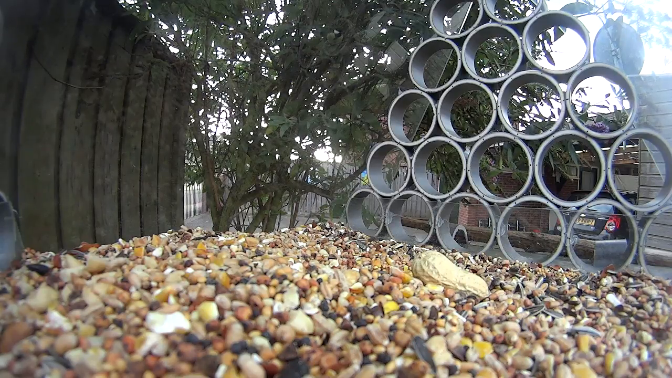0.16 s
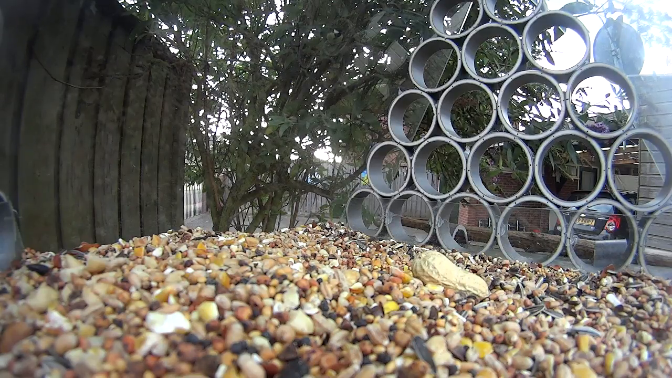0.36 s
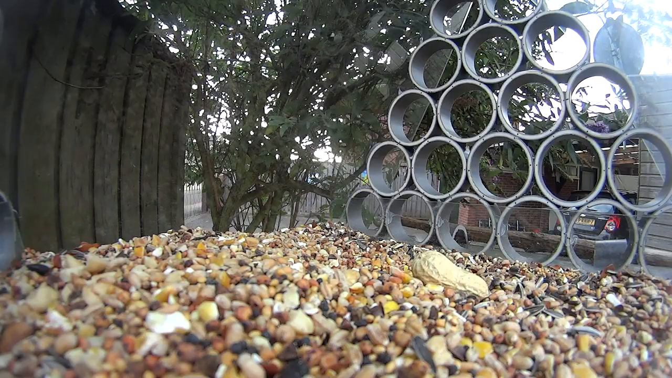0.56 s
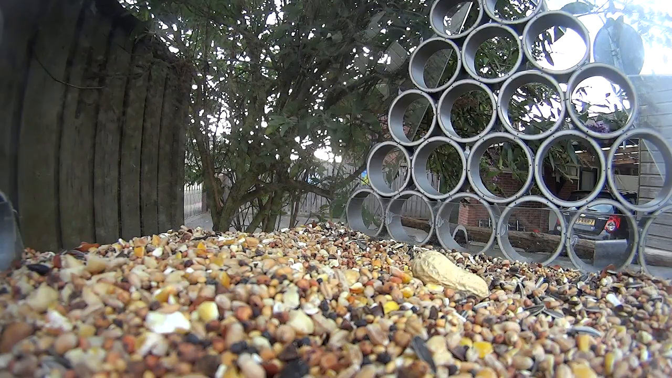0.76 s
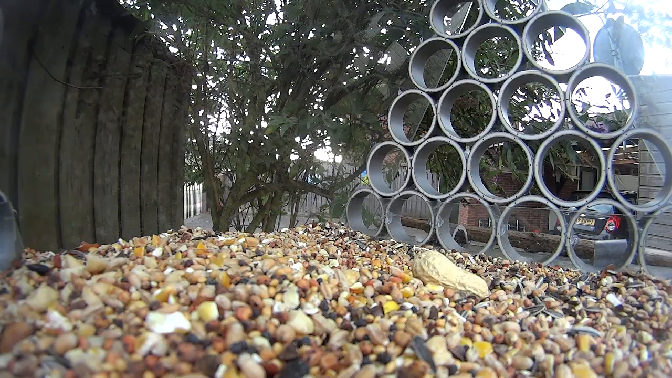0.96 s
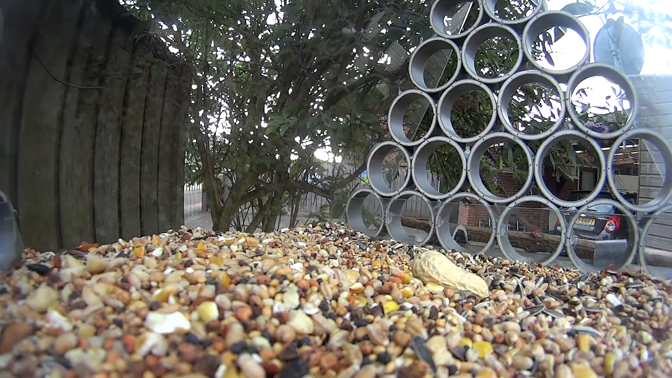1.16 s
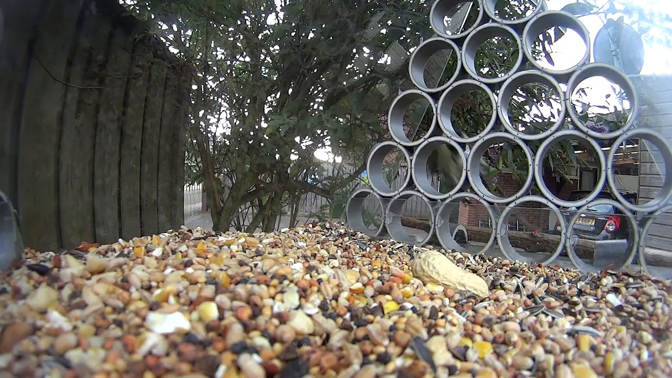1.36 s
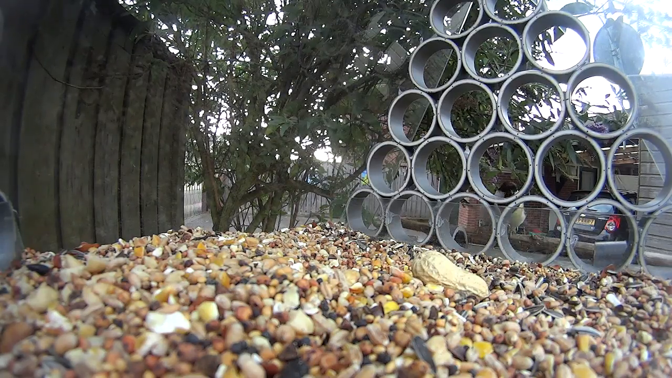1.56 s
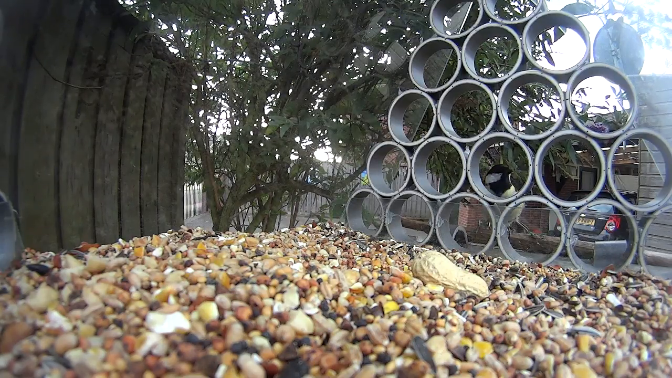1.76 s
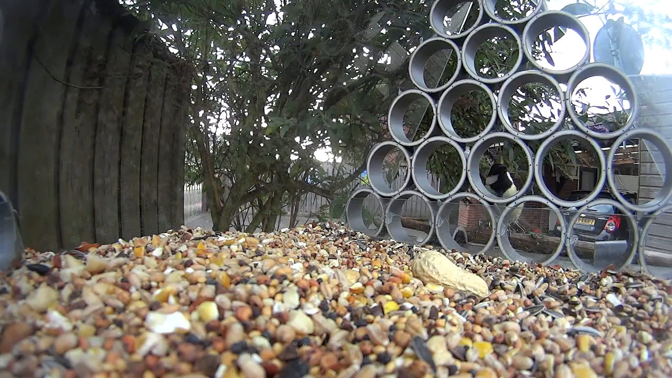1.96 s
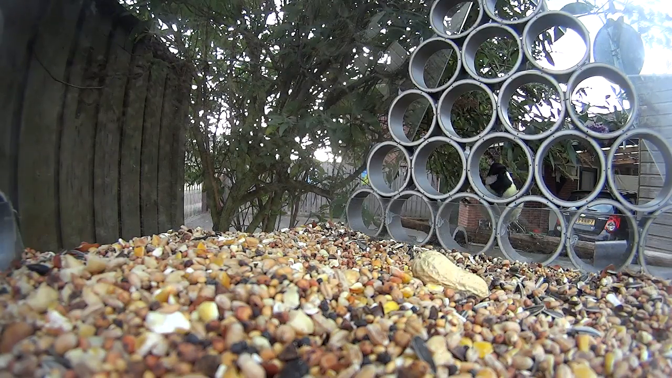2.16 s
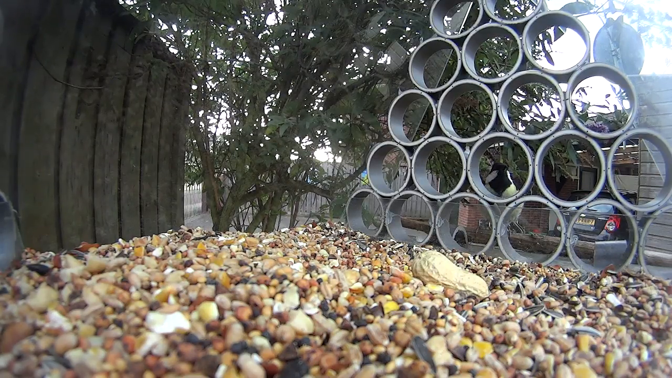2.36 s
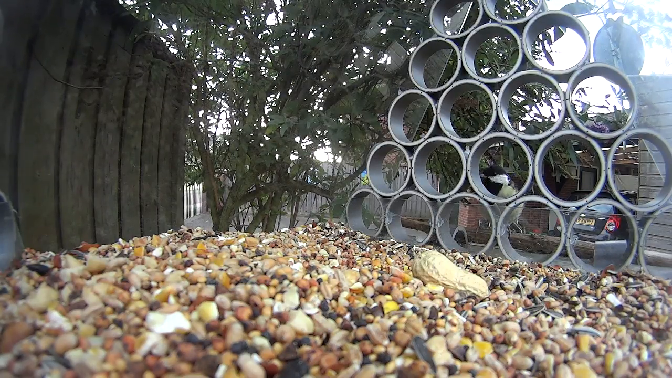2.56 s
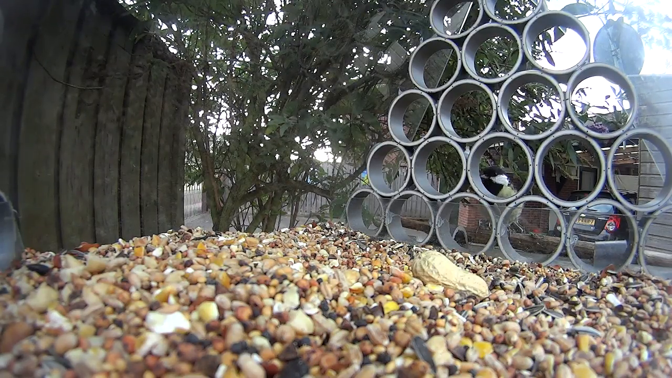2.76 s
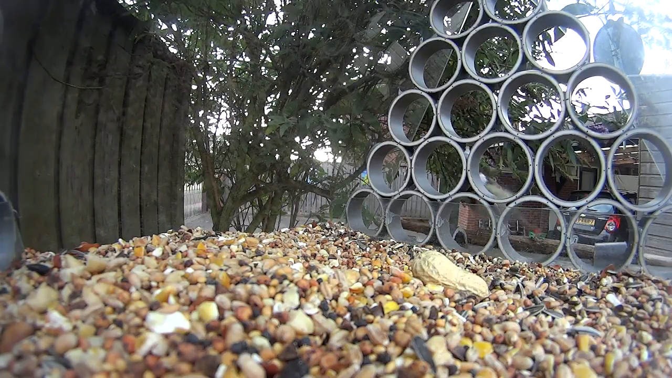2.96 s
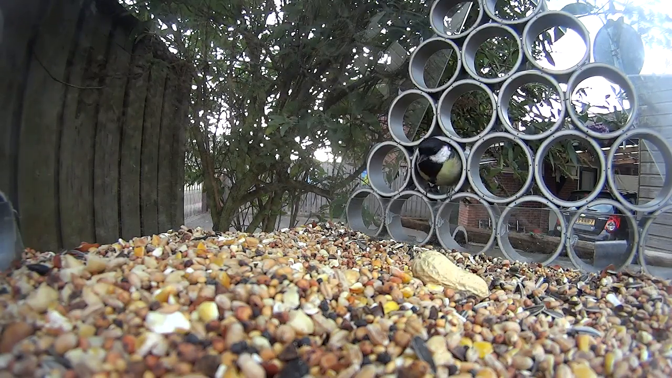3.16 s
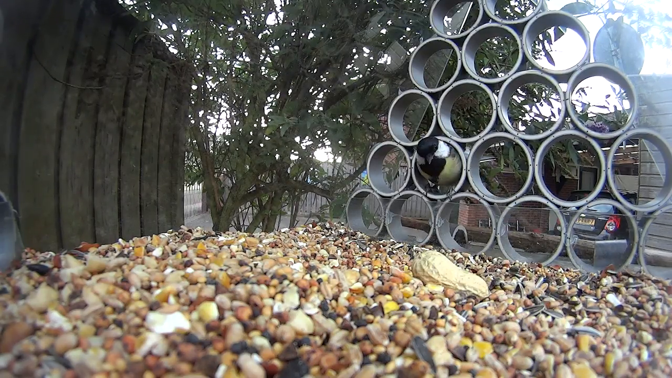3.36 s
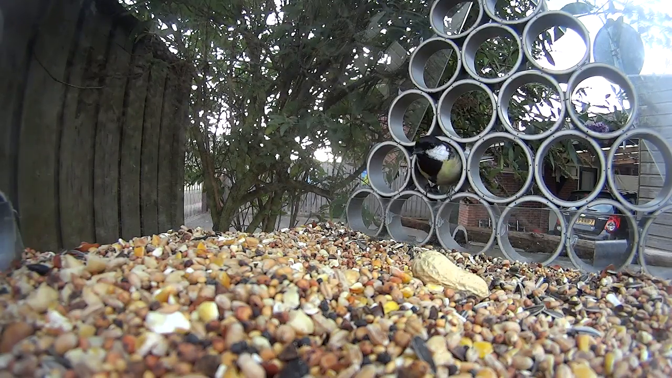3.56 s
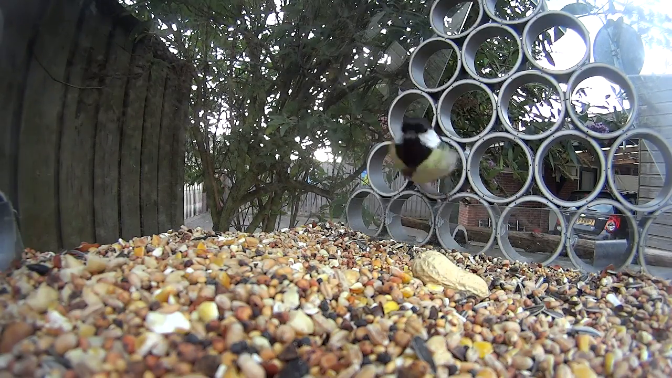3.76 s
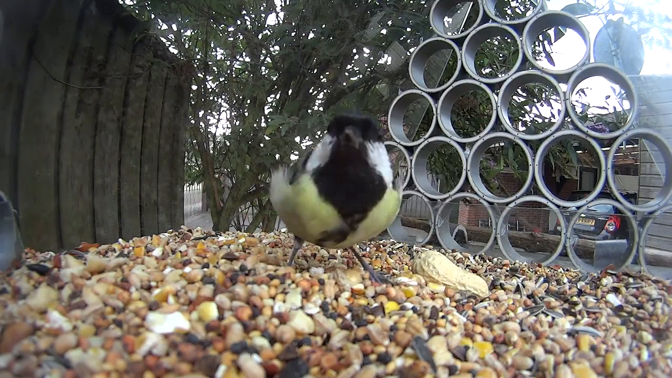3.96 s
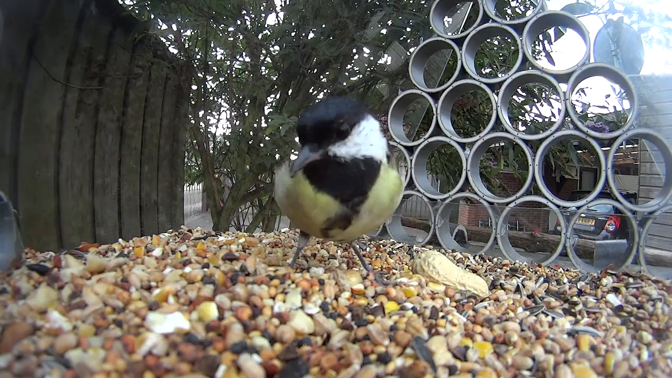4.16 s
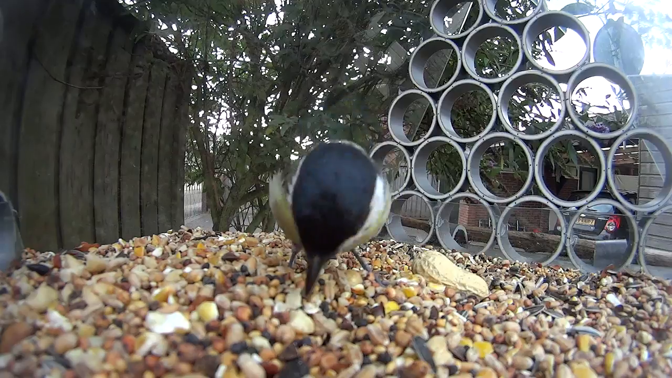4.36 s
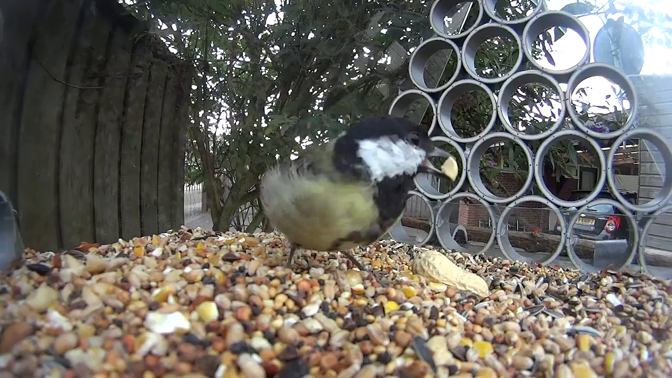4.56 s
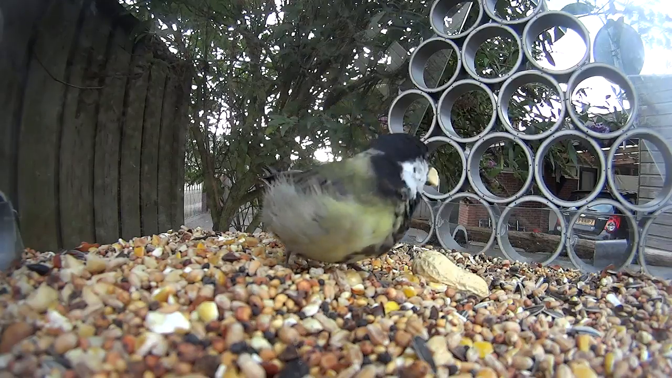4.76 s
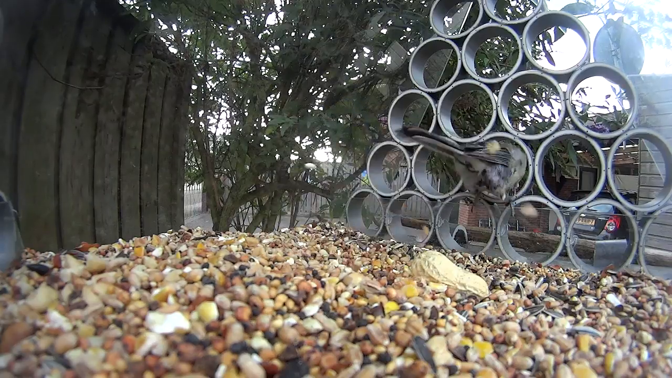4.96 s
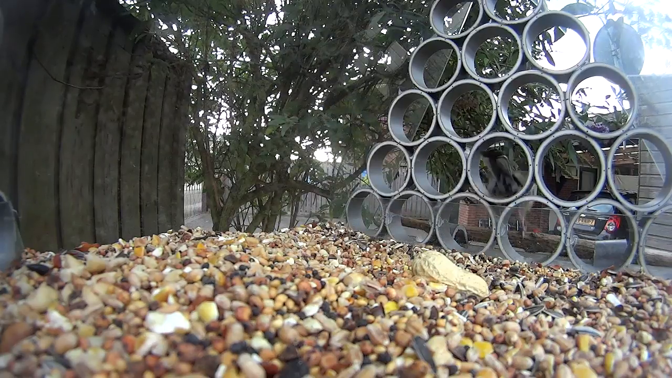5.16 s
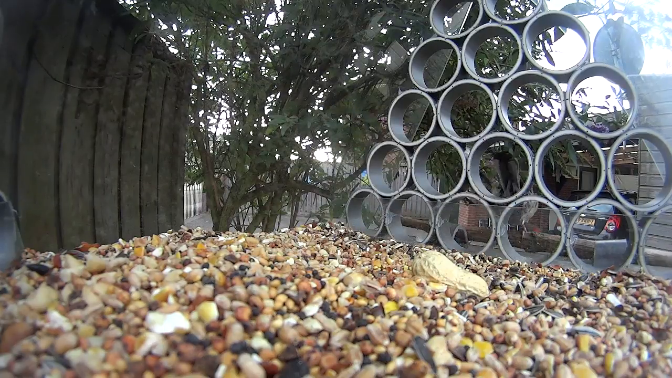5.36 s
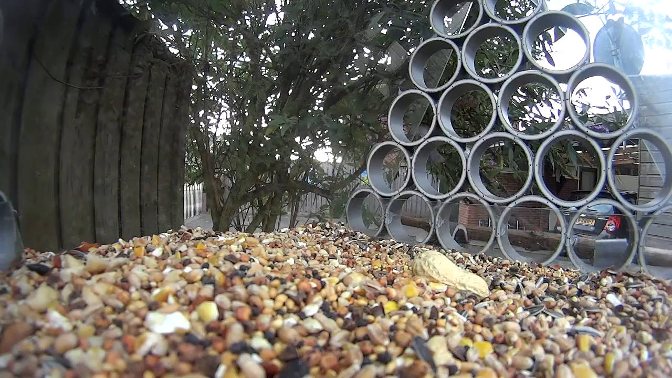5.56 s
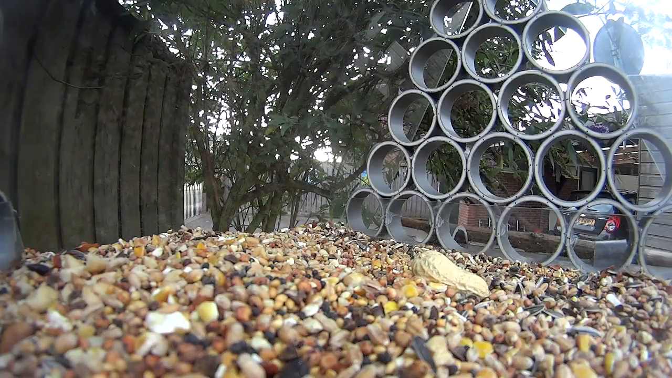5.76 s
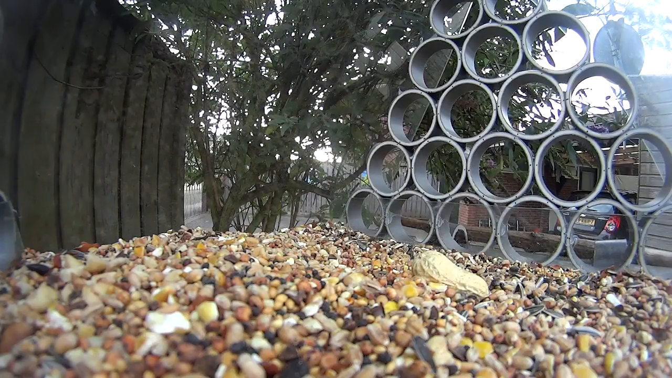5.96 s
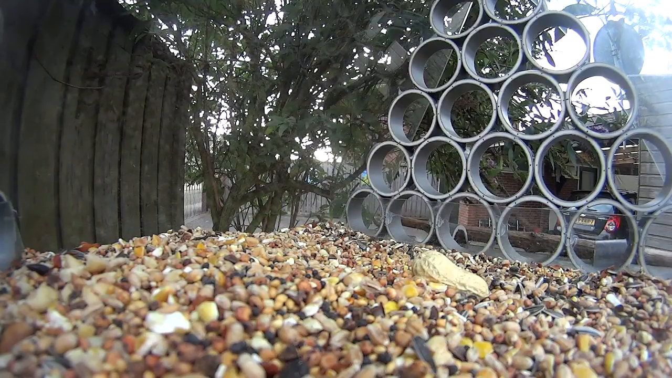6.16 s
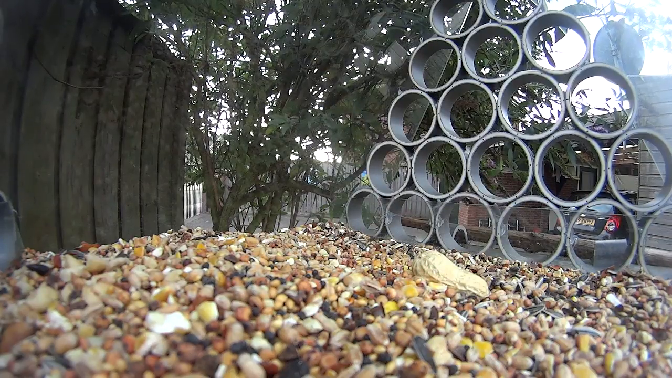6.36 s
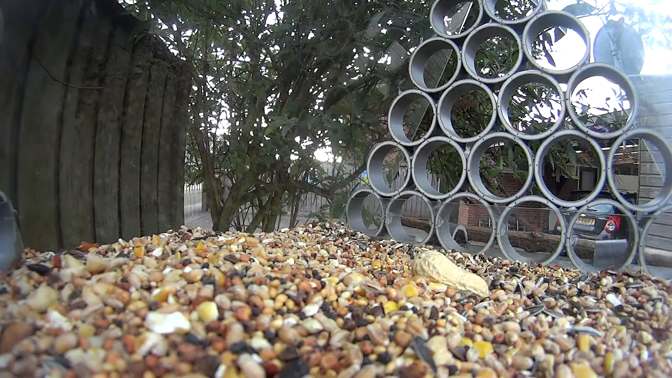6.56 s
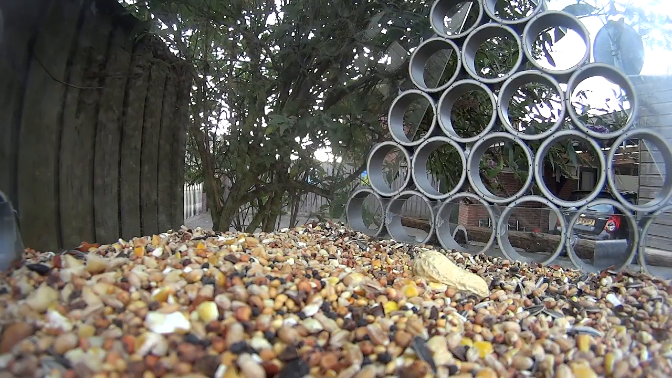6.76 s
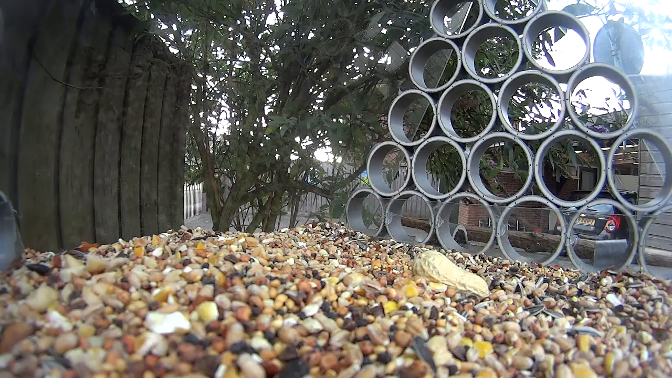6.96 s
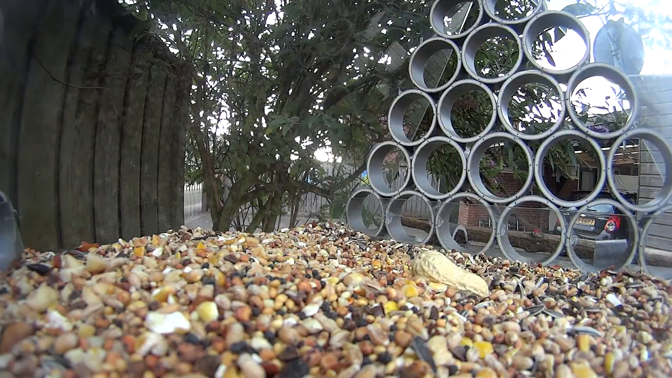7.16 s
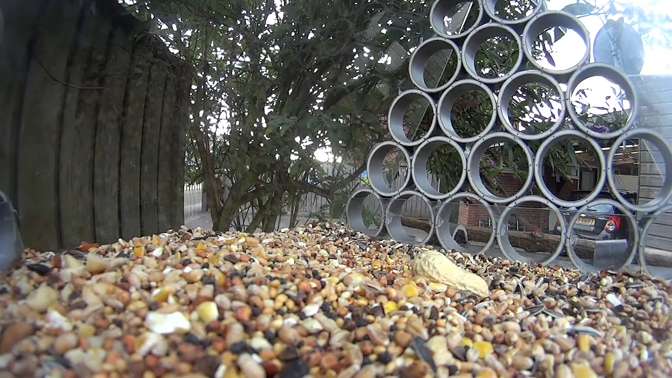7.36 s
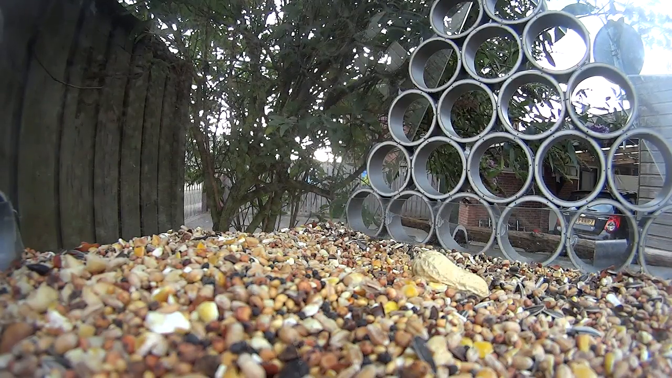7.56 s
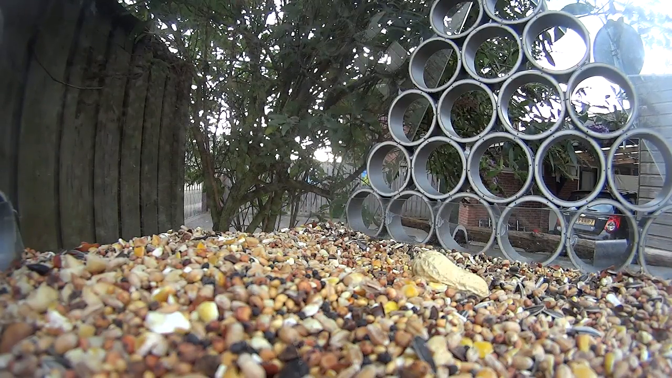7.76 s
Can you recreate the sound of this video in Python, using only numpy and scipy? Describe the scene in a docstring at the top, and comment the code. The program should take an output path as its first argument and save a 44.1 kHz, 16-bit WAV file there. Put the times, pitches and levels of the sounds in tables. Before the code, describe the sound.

A small bird's claws tick and scratch on hollow tubes and seed, with soft box thumps and rocking knocks over low traffic hum and hiss.

```python
"""At a hanging feeding house a small bird lands on the tube wall, hops over the seed and flies off.
Claws tick and scratch: noise bursts ring the tube wall and crack above it.
The house thumps and rocks against its mount: short pushes ring sets of decaying modes.
Street noise (five shaped bands) and passing engines (wavering sines) boom in the air of the box,
over the steady hiss of a two-port camera microphone."""
import sys
import numpy as np
from scipy import signal
from scipy.fft import rfft, irfft
from scipy.io import wavfile
from scipy.ndimage import uniform_filter1d

SR = 44100
rng = np.random.default_rng(int(sys.argv[2]) if len(sys.argv) > 2 else 0)


def materialize(psi):
    """Save the field psi as 16-bit PCM at rate SR to the path in sys.argv[1].

    A 1-D psi becomes a single channel; in a 2-D psi each row is a channel.
    """
    bounded = np.clip(np.atleast_2d(psi).T, -1, 1)
    quanta = np.round(bounded * 32767).astype(np.int16)
    wavfile.write(sys.argv[1], SR, quanta)


N = 345191  # samples

# claws on tubes and seed: (time [s], wall peak [dB], treble rms over 10 ms [dB], favoured ring [Hz])
CLAW_TICKS = [(1.35, -44.5, -64, 2000), (1.3852, -33, -44, 2670), (1.3917, -25.5, -52, 2100),
              (1.4784, -36, -56, 2540), (1.5054, -40, -57.5, 2060), (3.018, -36, -50, 2100),
              (3.0337, -30, -44.5, 2100), (3.061, -48, -54, 2000), (3.0933, -36, -61, 1970),
              (3.7628, -33, -47.5, 1740), (3.7667, -25.5, -53, 2260), (3.773, -37, -53, 2442),
              (4.4083, -53, -52.5, 2087), (4.8724, -50, -48, 1750), (4.8837, -42.5, -57, 2680),
              (4.8974, -53, -57, 1960), (4.9179, -34, -48, 2673), (4.921, -32, -38, 2020),
              (4.94, -40, -52, 2340), (4.955, -17, -26, 2830), (4.9857, -34, -54, 2413),
              (4.996, -31, -62, 2504), (5.0053, -30.5, -60, 1877), (5.018, -33, -50, 3040),
              (5.0242, -32, -51, 2000), (5.0655, -39.5, -50, 2400), (5.1257, -44, -54, 2600),
              (5.157, -50, -56, 2530), (5.1712, -38, -57, 1980), (5.2626, -47, -65, 2450),
              (5.4787, -27.5, -61.5, 2520), (5.4916, -29, -43.5, 2310), (5.5152, -32.5, -51, 2530),
              (5.534, -38, -48, 2530), (5.5796, -41, -54, 2160), (5.6015, -35, -59, 2556)]
# feet and feathers brushing through seed:
# (time [s], length [s], wall rms [dB], treble rms [dB], favoured ring [Hz])
SEED_SCRAPES = [(1.321, 0.048, -54.5, -63, 2400), (1.39, 0.015, -62, -53, 2200),
                (3.008, 0.078, -53, -59, 2300), (3.091, 0.034, -55, -63, 2200),
                (3.729, 0.042, -57.5, -69, 2007), (3.821, 0.059, -45.5, -50, 1660),
                (4.415, 0.013, -55, -61, 2100), (4.829, 0.038, -58, -55.5, 2100),
                (4.917, 0.013, -36, -54, 2280), (4.973, 0.076, -51, -53, 2300),
                (5.04, 0.069, -67, -59.5, 2400), (5.117, 0.073, -60, -63, 2400),
                (5.433, 0.028, -55, -58, 2390), (5.492, 0.079, -61, -60, 2400)]
# tube wall modes: (frequency [Hz], level [dB], t60 [s])
WALL_MODES = [(1707, 7, 0.012), (2060, 0, 0.024), (2490, 8, 0.018), (2920, -1, 0.024), (3280, -12, 0.006)]
CONTACT_MS, CONTACT_MS_PER_DB, USUAL_TREBLE_DB = 3.16, 0.01, -61  # brighter ticks grind longer
EDGE_GAIN = 8.5  # sharp first touch of a claw, over the grit
# each rocking strike also ticks in the tube wall; dB relative to the strike
RATTLE_HZ, RATTLE_DB, RATTLE_TREBLE_DB, RATTLE_LEAD_S = 2500, -11.5, -28.5, .0005


def claws():
    """Ticks are short bursts of grit, scrapes dense runs of seed clicks; both ring the wall and crack."""
    out = np.zeros(N)
    rattle = [(s - RATTLE_LEAD_S, db + RATTLE_DB, db + RATTLE_TREBLE_DB, RATTLE_HZ)
              for s, db, _ in rocking()]
    for s, wall_db, treble_db, hz in CLAW_TICKS + rattle:
        grit = tick_grit(treble_db)
        treble = crack(grit)
        wall = ring(WALL_MODES, scatter_db=-2.0, push=grit, near_hz=hz)
        add(out, undb(wall_db) * wall, s - .0005)
        add(out, undb(treble_db) * treble / np.std(treble[:SR // 100]), s - .0005)
    for s, length_s, wall_db, treble_db, hz in SEED_SCRAPES:
        grit = scrape_grit(length_s)
        wall = ring(WALL_MODES, scatter_db=1.5, push=grit, near_hz=hz, fall_db=18)
        add(out, undb(wall_db) * wall / np.std(wall[:len(grit)]), s)
        add(out, undb(treble_db) * unit(crack(grit)), s)
    # light claws move no bass
    return signal.sosfilt(signal.butter(3, 1400, "high", fs=SR, output="sos"), out)


def tick_grit(treble_db):
    """Decaying noise with one sharp edge: a claw touches, then grinds."""
    t = np.arange(SR // 40) / SR
    decay_ms = CONTACT_MS + CONTACT_MS_PER_DB * (treble_db - USUAL_TREBLE_DB)
    x = 1000 * t / max(decay_ms, 1)
    grit = rng.standard_normal(len(t)) * (1 - np.exp(-15 * x)) * np.exp(-x)
    grit[SR // 3000] += EDGE_GAIN
    return grit


def scrape_grit(length_s):
    """Noise in 60-sample grains of random level: seeds slip one after another."""
    noise, chance = rng.standard_normal((2, SR // 8))[:, :int(length_s * SR)]
    grains = undb(3 * np.repeat(chance, 60)[:len(noise)])
    swell = np.sin(np.linspace(0, np.pi, len(noise))) ** 0.76
    return noise * grains * swell


# treble colour of the box: (frequency [Hz], width [Hz], level [dB])
TREBLE_PEAKS = [(3340, 700, -3), (4120, 220, 6), (5200, 460, 2.5), (6480, 550, 6), (7640, 1400, -2.5),
                (8520, 500, 0), (9850, 1600, -9.5)]


def crack(push):
    """The bare contact: broad treble from parallel resonances of alternating sign."""
    out = 0
    for k, (hz, width_hz, db) in enumerate(TREBLE_PEAKS):
        b, a = signal.iirpeak(hz, hz / width_hz, SR)
        out = out + (-1) ** k * undb(db) * signal.lfilter(b, a, push)
    return out


# single knocks of the house against its mount: (time [s], peak [dB], push and favoured ring [Hz])
MOUNT_KNOCKS = [(1.35, -37, 501), (1.39, -31.5, 750), (1.48, -28.5, 784), (1.508, -29, 760),
                (2.524, -34.5, 553), (4.925, -24, 528), (5.006, -28.5, 514), (5.178, -28, 667),
                (5.266, -30, 743), (5.453, -37.5, 504)]
# the bird's weight lands or pushes off: (time [s], boom peak [dB], sway peak [dB], boom push [ms])
WEIGHT_THUMPS = [(1.346, -18, -33, 4.4), (1.393, -17, -43, 16), (1.479, -18.5, -44, 6.7),
                 (1.504, -20.5, -46, 7.8), (3.009, -21, -41, 8.6), (3.046, -22, -28, 5.3),
                 (4.919, -13.5, -52, 14.3), (5.003, -23.5, -34, 18), (5.449, -34.5, -44, 5.3),
                 (5.486, -24, -37.5, 8.8), (5.515, -18, -24, 4), (5.599, -28, -30, 6.2)]
# modes of mount, box air and sway: (frequency [Hz], level [dB], t60 [s])
MOUNT_MODES = [(542, -10, 0.11), (686, -5.5, 0.04), (747.3, -3.5, 0.1), (799.4, -1, 0.066),
               (1010, -1, 0.087), (1334, -1, 0.062)]
AIR_MODES = [(250, -14, .07), (305, 0, .07), (345, -11, .1)]
SWAY_MODES = [(65.7, -27, 0.11), (120, -2, 0.064), (195, -15, 0.097)]


def house():
    """Knocks ring the mount; soft landings push the air of the box and sway it."""
    out = np.zeros(N)
    for s, db, hz in MOUNT_KNOCKS + rocking():
        push = flex(hz, ms=6)
        add(push, 2.8 * np.hanning(14), 0)  # a hard edge wakes the upper modes
        knock = ring(MOUNT_MODES, scatter_db=1.5, push=push, near_hz=hz, fall_db=13)
        add(out, undb(db) * knock, s - .002)
    for s, boom_db, sway_db, push_ms in WEIGHT_THUMPS:
        boom = ring(AIR_MODES, scatter_db=1.5, push=flex(305, push_ms))
        sway = ring(SWAY_MODES, scatter_db=2, push=np.hanning(150))
        add(out, undb(boom_db) * boom, s)
        add(out, undb(sway_db) * sway, s)
    return out


def flex(hz, ms):
    """A soft contact: the panel flexes as a sine under a Hann window."""
    t = np.arange(int(ms * SR / 1000)) / SR
    return np.sin(2 * np.pi * hz * t) * np.hanning(len(t))


# runs of strikes as the house rocks: (first strike [s], first swing [ms], shortening per swing [ms],
# first peak [dB], fade over the first swing [dB], push and favoured ring [Hz])
ROCKING_RUNS = [(3.0135, 86, 0, -29, 2, 735), (3.0485, 84, 2, -30, 2, 760),
                (5.478, 87.5, 4.1, -27.5, 1.1, 755), (5.515, 88.3, 4.8, -28.5, .62, 790)]
FADE_POWER = 1.72


def rocking():
    """Time, level and ring of all strikes: swings hold or shorten, levels fade ever faster."""
    k = np.arange(10)
    s, ms, less_ms, db, fade_db, hz = np.array(ROCKING_RUNS).T[:, :, None]
    strike_s = s + k * (ms - less_ms * (k - 1) / 2) / 1000
    strike_db = db - fade_db * k ** FADE_POWER
    strike_hz = hz + 0 * k
    return list(zip(strike_s.ravel(), strike_db.ravel(), strike_hz.ravel()))


# street levels: (time [s], rumble [dB], drone [dB], hollow boom [dB], tyre roar [dB])
STREET_LEVELS = [(0.0, -51, -38, -37, -57.5), (0.22, -48.5, -45.5, -34.5, -55),
                 (0.74, -46.5, -42.5, -36.5, -54), (1.37, -43, -38, -35, -55), (1.81, -46, -44, -36, -56.5),
                 (2.22, -48.5, -38.5, -33.5, -55.5), (2.61, -44, -43.5, -35.5, -55.5),
                 (2.99, -50, -39.5, -31.5, -54.5), (3.18, -41, -37, -33.5, -54.5),
                 (4.08, -47, -41, -33.5, -57), (4.42, -49, -44.5, -34, -59.5), (5.17, -46, -44, -38, -59),
                 (5.51, -38.5, -41.5, -35.5, -60), (5.69, -43.5, -36, -36.5, -60.5),
                 (6.3, -51, -46.5, -37, -62.5), (6.67, -49, -50, -35.5, -64), (7.09, -52, -46.5, -38, -65),
                 (7.83, -50.5, -52.5, -39, -69)]
# street noise as the box colours it: (frequency [Hz], density [dB per Hz])
RUMBLE_SHAPE = [(14, -43), (30, -11), (52, -2.5), (70, -1.5), (95, -1.5), (115, 0), (140, -1), (180, -2),
                (200, -2)]
DRONE_SHAPE = [(160, -39), (185, -14.5), (230, -1), (270, -2), (295, -2)]
HOLLOW_SHAPE = [(250, -16.5), (280, -5.5), (325, 3), (360, -3.5), (410, -13), (470, -19.5), (520, -74)]
MURMUR_SHAPE = [(430, -16), (480, 0.5), (600, -0.5), (680, -6), (755, 1), (830, -13.5), (985, -9),
                (1080, -18.5), (1200, -71)]
ROAR_SHAPE = [(1100, -11), (1380, 0.5), (1650, -3.5), (2040, 2.5), (2300, -7), (2560, 1.5), (2800, -11),
              (3100, -13), (4500, -21), (7000, -25)]
MURMUR_DB, MURMUR_FOLLOWS = -47, 0.81  # murmur at the loudest roar; share of the roar's swell


def street():
    """Five bands of traffic noise swell and flicker; engine tones waver on top."""
    t = np.arange(N) / SR
    s, rumble, drone, hollow, roar = np.transpose(STREET_LEVELS)
    murmur = MURMUR_DB + MURMUR_FOLLOWS * (roar - roar.max())
    bands = [(rumble, RUMBLE_SHAPE), (drone, DRONE_SHAPE), (hollow, HOLLOW_SHAPE),
             (murmur, MURMUR_SHAPE), (roar, ROAR_SHAPE)]
    out = np.zeros(N)
    for db, shape in bands:
        flicker_db = 0.83 * walk(7.5)
        out += undb(np.interp(t, s, db) + flicker_db) * coloured(shape)
    return out + engines(t)


# a distant engine hum: (time [s], pitch [Hz], level [dB])
HUM_TRACK = [(0, 98.9, -40.5), (.62, 96.7, -42.5), (.8, 96.4, -39), (1.35, 95.2, -66), (1.68, 94, -51),
             (2.92, 93, -54.5), (3.07, 92.8, -42.5), (3.38, 89.5, -40.5), (3.55, 94, -47), (5.1, 95, -50.5),
             (5.6, 95.7, -44.5), (6.25, 95.2, -44), (6.452, 95, -58), (7.83, 88.8, -51)]
# centres of brief drops in the hum: time [s]
HUM_DIPS_S = [.24, .7, 1.73, 3.41, 4.45, 5.82, 6.14]
DIP_DB, DIP_WIDTH_S = -22, .04
# engines that come and go: (start [s], length [s], from [Hz], to [Hz], level [dB])
ENGINE_PASSES = [(-.1, 1.18, 196, 196.7, -43.5), (.4, 2.17, 49, 51.6, -67), (2.293, 0.42, 128, 145, -47.5),
                 (2.986, 1.59, 116.5, 124, -58), (6.35, 0.84, 135, 139.5, -51.5)]
SWELL_POWER = .3  # roundness of the rise and fall


def engines(t):
    """Engine tones: one gliding hum that dips briefly, and passes that swell and slide in pitch."""
    s, hz, db = np.transpose(HUM_TRACK)
    dips_db = sum(DIP_DB * np.exp(-((t - at) / DIP_WIDTH_S) ** 2) for at in HUM_DIPS_S)
    out = tone(np.interp(t, s, hz), np.interp(t, s, db) + dips_db, waver_db=.8)
    for s, length_s, from_hz, to_hz, db in ENGINE_PASSES:
        x = np.clip((t - s) / length_s, 0, 1)
        swell = np.abs(np.sin(np.pi * x)) ** SWELL_POWER
        out += swell * tone(from_hz + (to_hz - from_hz) * x, db, waver_db=1.)
    return out


def tone(hz, db, waver_db):
    """A sine that wavers in pitch and level."""
    phase = 2 * np.pi * np.cumsum(hz + .3 * walk(5)) / SR
    return np.sqrt(2) * undb(db + waver_db * walk(5)) * np.sin(phase)


# microphone hiss: (frequency [Hz], density [dB per Hz], likeness of the ports [-1..1])
HISS_SHAPE = [(298, 4, -0.15), (1090, 5, -0.84), (1680, 0, -0.62), (3000, -3.5, -0.41), (3700, -5.5, -0.28),
              (5600, -7.5, 0.19), (6860, -8, 0.34), (7900, -10, 0.44), (11000, -10.5, 0.64)]
HISS_DB = -53


def hiss():
    """Steady microphone noise, partly shared or opposed between the channels."""
    db, like = over_hz(HISS_SHAPE)
    like = np.clip(like, -1, 1)
    mid, side = rfft(rng.standard_normal((2, N))) * undb(db) * np.sqrt([1 + like, 1 - like])
    return undb(HISS_DB) * unit(irfft([mid + side, mid - side], N))


def undb(db):
    """Gain of a dB value."""
    return 10 ** (np.asarray(db) / 20)


def unit(x):
    """Scale to rms 1."""
    return x / np.sqrt(np.mean(x ** 2))


def add(out, x, s):
    """Mix x into out from time s."""
    i = int(s * SR)
    out[i:i + len(x)] += x[:len(out) - i]


def over_hz(table):
    """Columns of a (Hz, ..) table at every frequency bin, interpolated over log frequency."""
    hz, *columns = np.transpose(table)
    log_bins = np.log(np.fft.rfftfreq(N, 1 / SR) + 1)
    return [np.interp(log_bins, np.log(hz), c) for c in columns]


def coloured(shape):
    """Noise of rms 1 shaped by the table, falling to -90 dB an octave beyond its ends."""
    closed = [(shape[0][0] / 2, -90)] + shape + [(shape[-1][0] * 2, -90)]
    return unit(irfft(rfft(rng.standard_normal(N)) * undb(over_hz(closed)[0]), N))


def walk(rate_hz):
    """Random levels of rms 1, held 1 / rate_hz s and slewed twice."""
    k = int(SR / rate_hz)
    held = np.repeat(rng.standard_normal(N // k + 1), k)
    return unit(uniform_filter1d(uniform_filter1d(held, k), k)[:N])


def ring(modes, scatter_db, push, near_hz=None, fall_db=25):
    """A push rings decaying modes, weaker by fall_db an octave from near_hz; all scatter. Peak 1."""
    hz, db, t60 = np.array(modes).T[:, :, None]
    if near_hz:
        db = db - fall_db * np.abs(np.log2(hz / near_hz))
    t = np.arange(SR // 8) / SR
    detune, sign, size = rng.standard_normal((3, len(modes), 1))
    decay = np.exp(-np.log(1000) * t / t60)
    waves = np.sin(2 * np.pi * hz * (1 + 0.011 * detune) * t) * decay
    response = np.sum(np.sign(sign) * undb(db + scatter_db * size) * waves, axis=0)
    y = signal.fftconvolve(response, push)
    return y / np.max(np.abs(y))


# box sound at the ports: (frequency [Hz], right lead [rad], left minus right [dB], lead scatter [rad])
PORT_RESPONSE = [(40, -0.058, .5, .03), (100, 0.3, 0.5, .05), (172, 0.43, 0.7, .04),
                 (324, 0.65, -0.4, 0.069), (530, 0.86, -1.5, 0.48), (810, 0.77, -0.5, 0.17),
                 (1480, 1.1, -5, 2), (2100, -0.17, 1, 0.27), (2580, 1.05, 3, 0.79), (2900, 0.068, -1, 0.45),
                 (3950, -1.2, -1, 0.64), (6660, 1.3, -1, 0.2), (9050, 0.19, -2, 0.77)]


def scene():
    """Each port hears the box at its own level and phase; near echoes scatter the lead over frequency."""
    lead, pan_db, scatter = over_hz(PORT_RESPONSE)
    ripple = unit(uniform_filter1d(rng.standard_normal(len(lead)), size=300))
    sign = np.array([[1], [-1]])  # left, right
    ports = undb(sign * pan_db / 2) * np.exp(-.5j * sign * (lead + scatter * ripple))
    box = claws() + house() + street()
    return irfft(rfft(box) * ports, N) + hiss()


TOP_HZ = 10950


def record(dry):
    """The camera cuts the top steeply: an elliptic low-pass."""
    return signal.sosfilt(signal.ellip(10, .3, 60, TOP_HZ, fs=SR, output="sos"), dry)


dry = scene()
out = record(dry)
materialize(out)
```